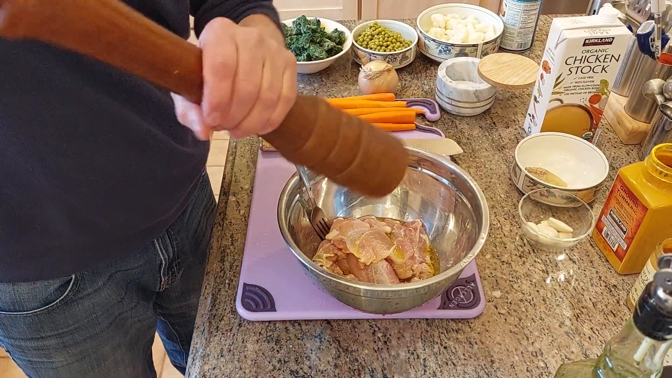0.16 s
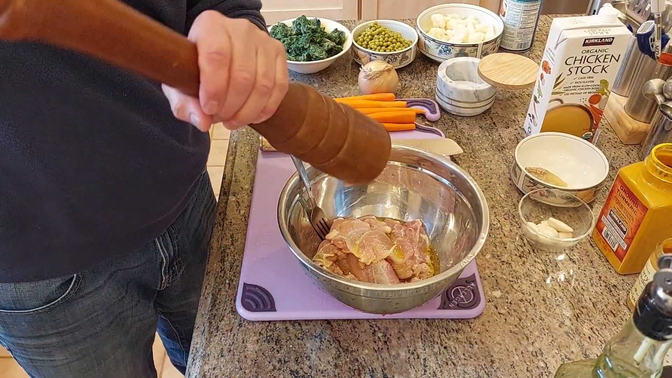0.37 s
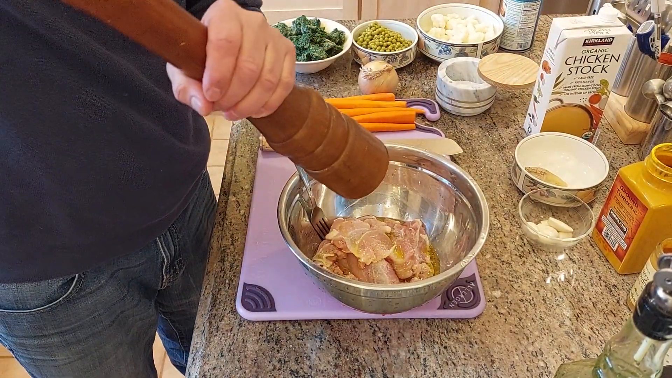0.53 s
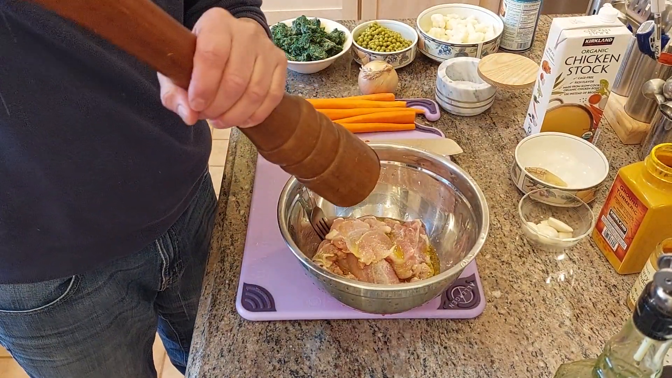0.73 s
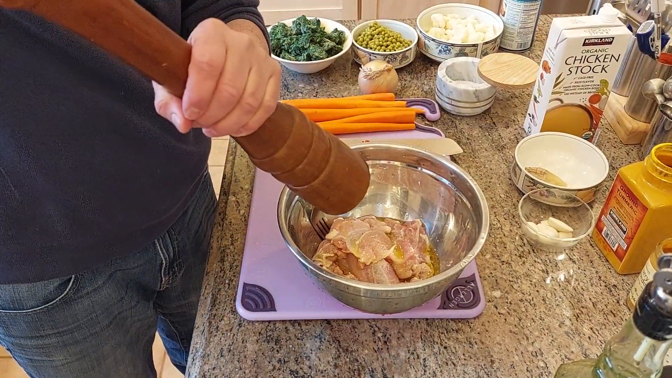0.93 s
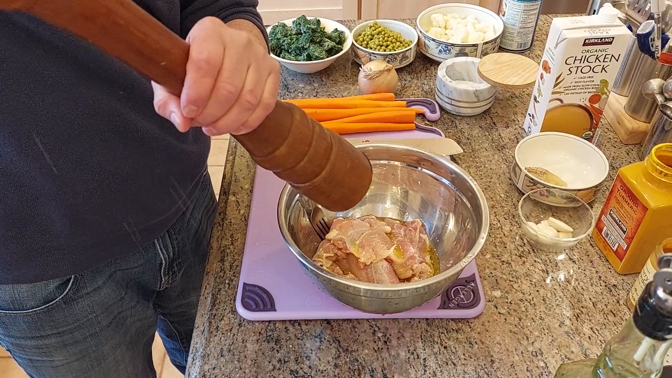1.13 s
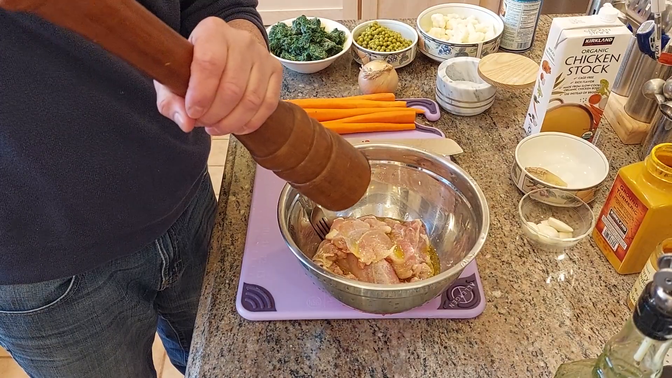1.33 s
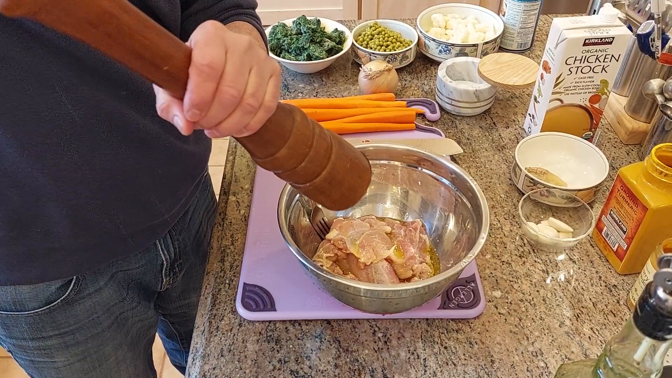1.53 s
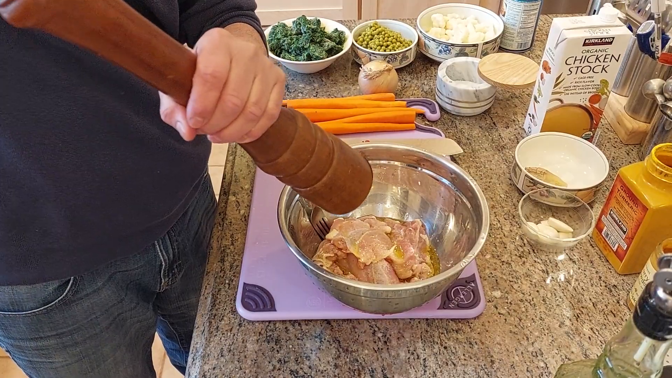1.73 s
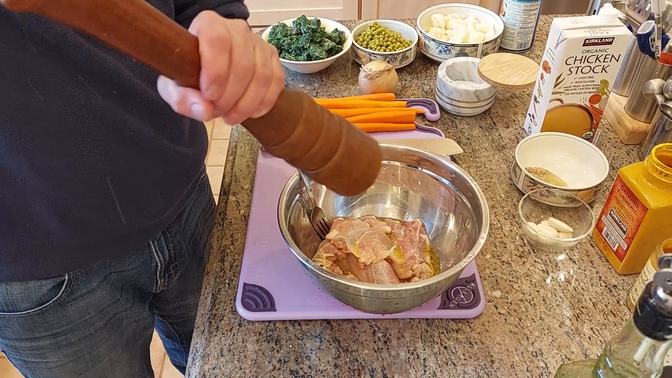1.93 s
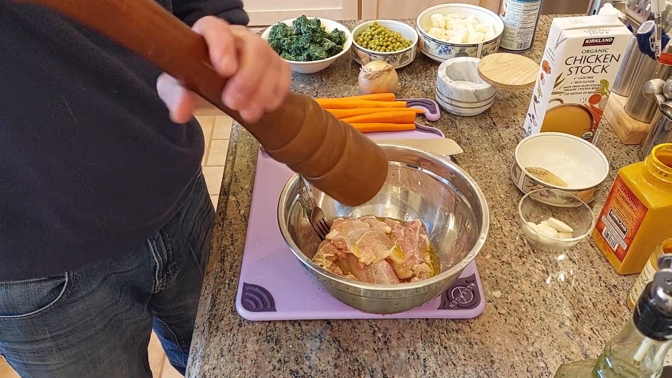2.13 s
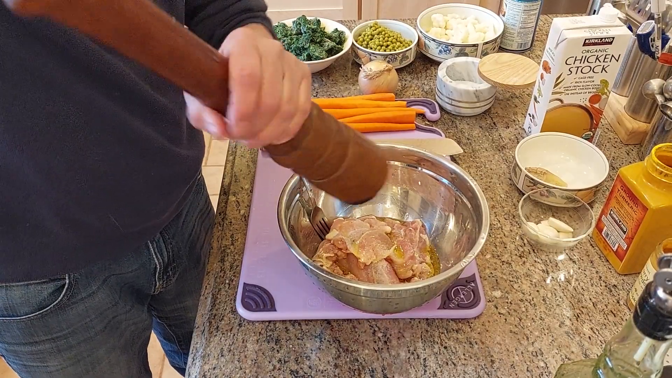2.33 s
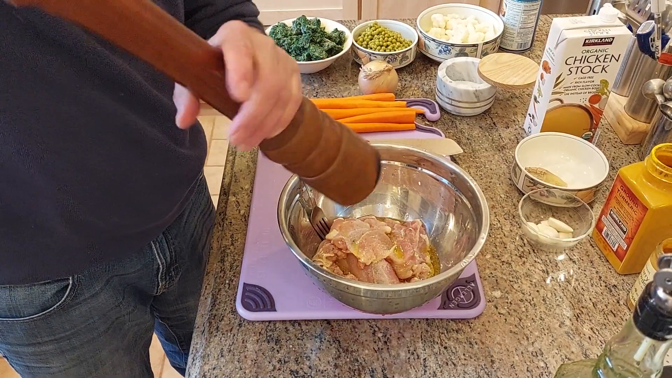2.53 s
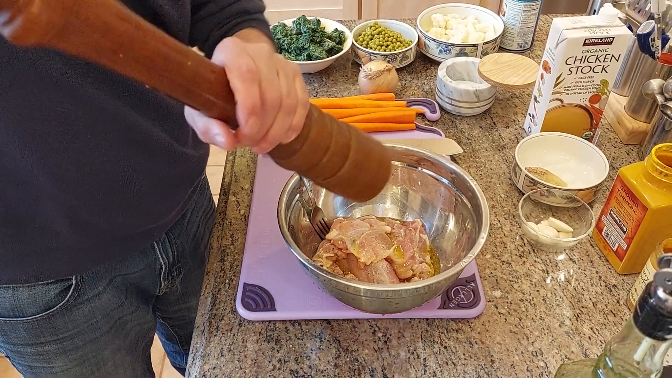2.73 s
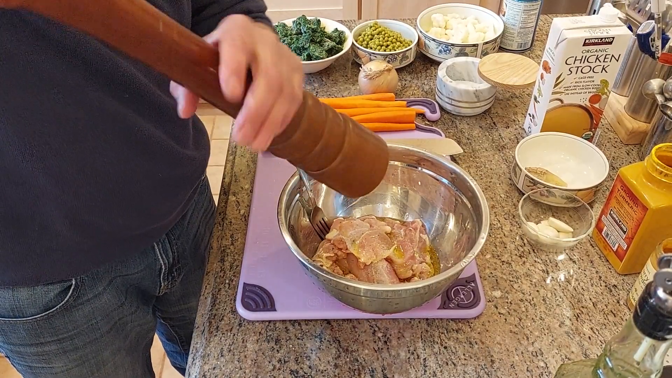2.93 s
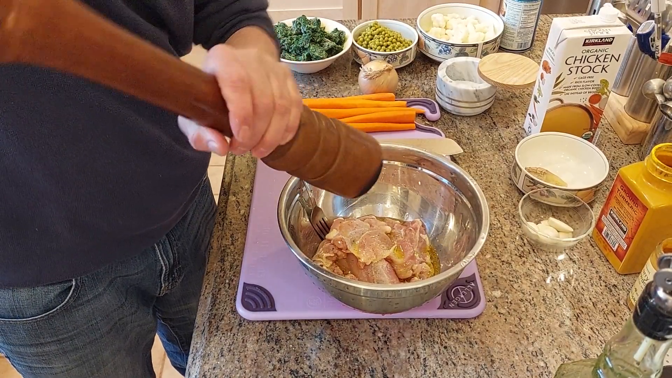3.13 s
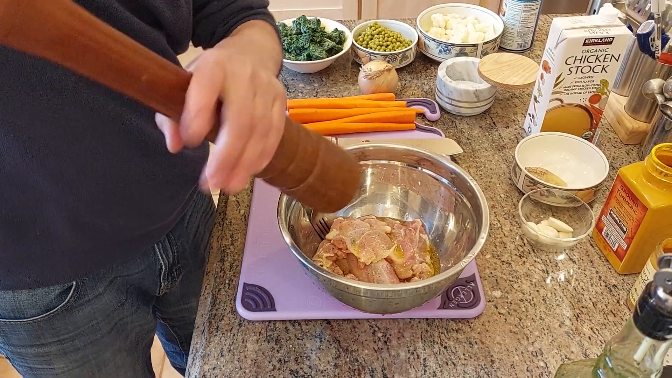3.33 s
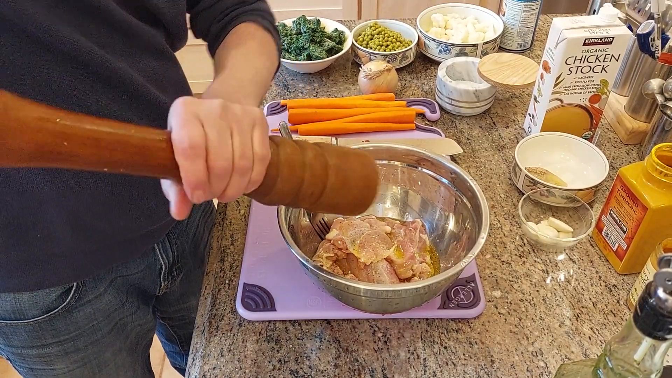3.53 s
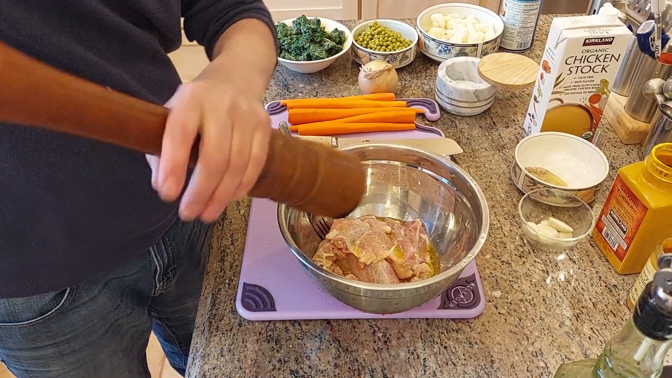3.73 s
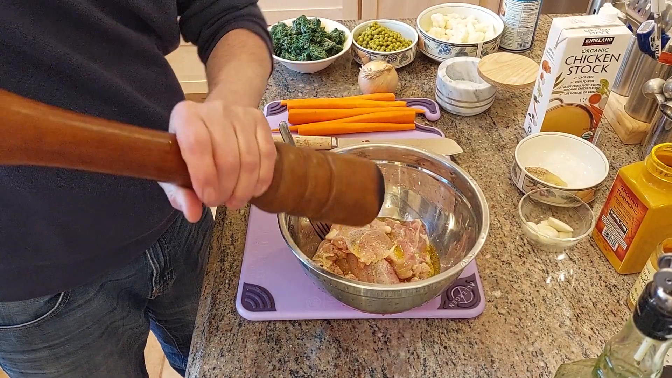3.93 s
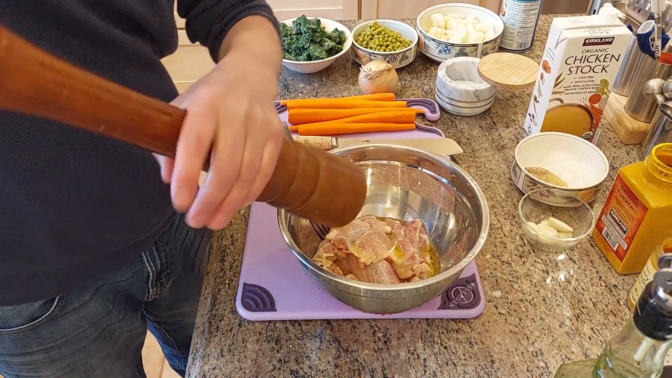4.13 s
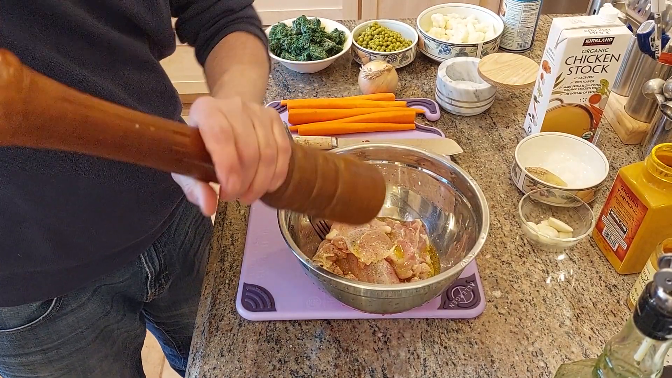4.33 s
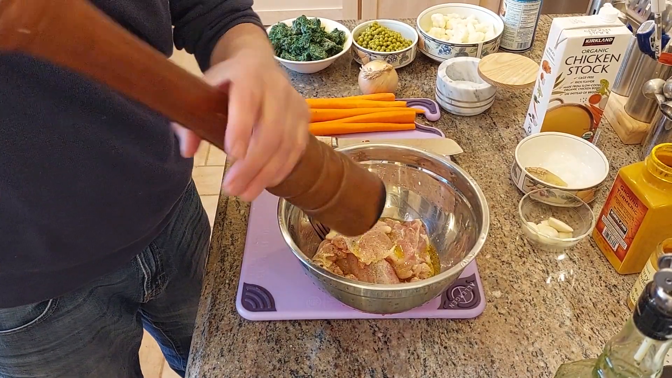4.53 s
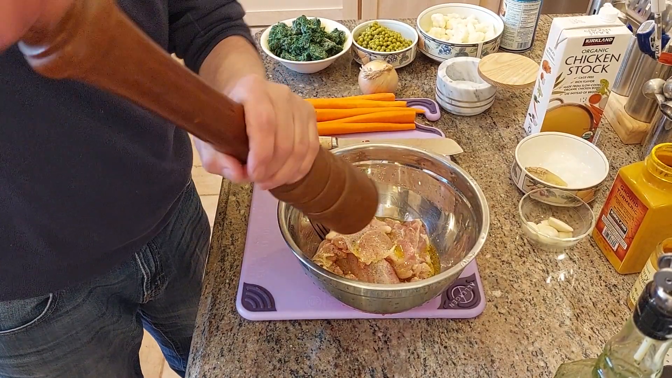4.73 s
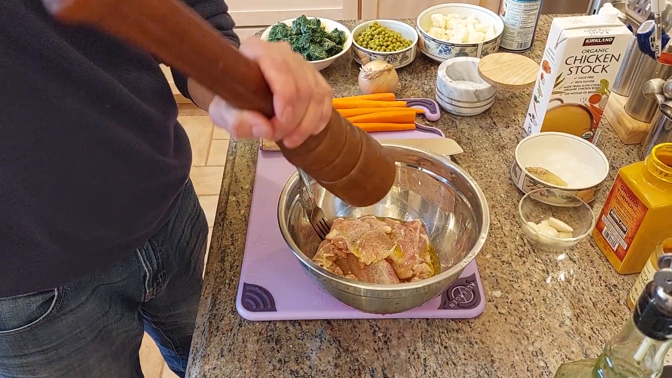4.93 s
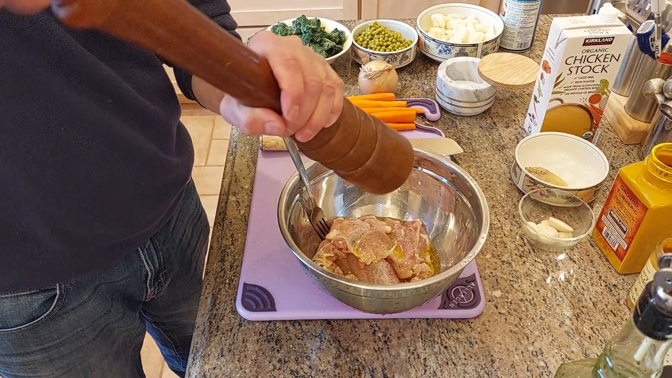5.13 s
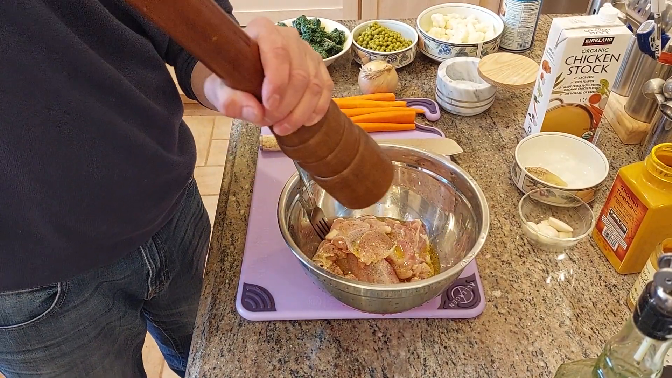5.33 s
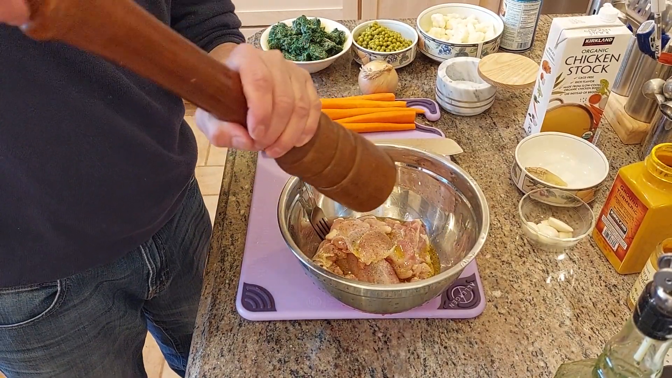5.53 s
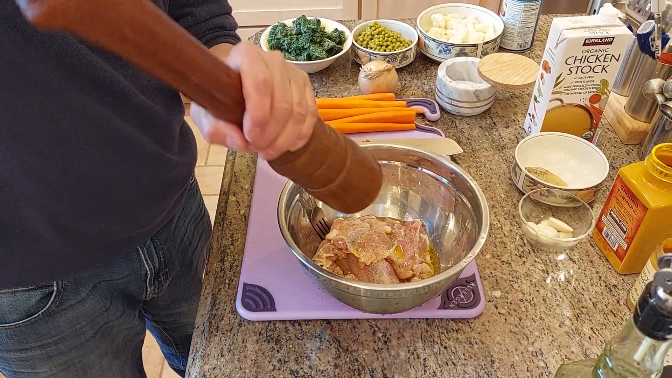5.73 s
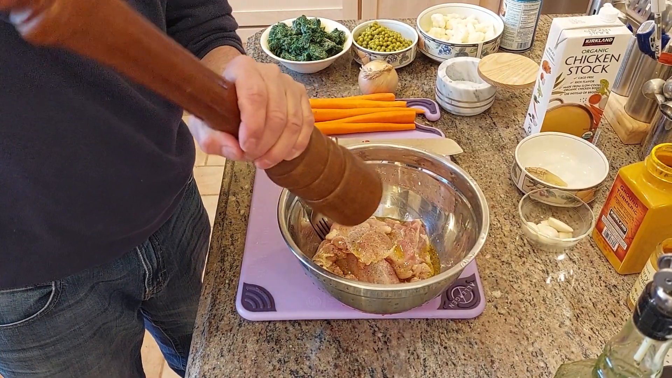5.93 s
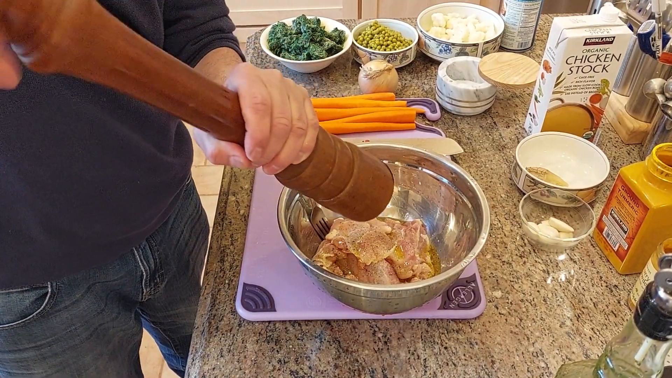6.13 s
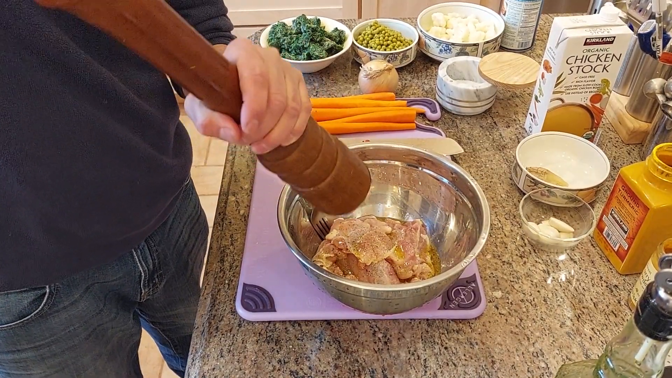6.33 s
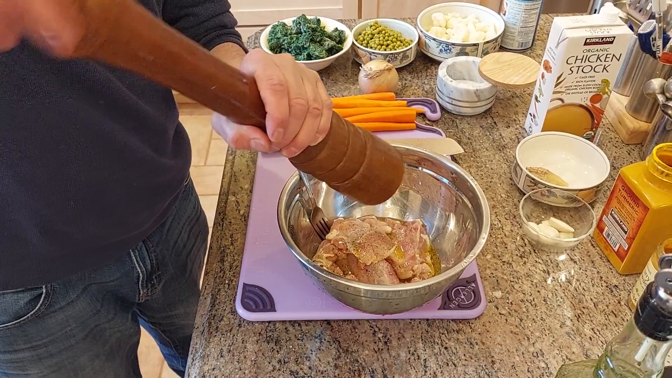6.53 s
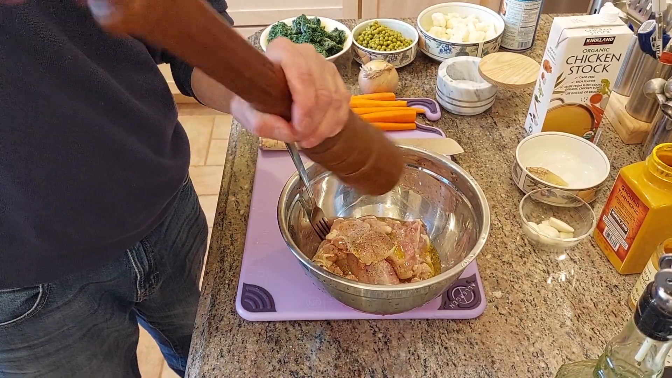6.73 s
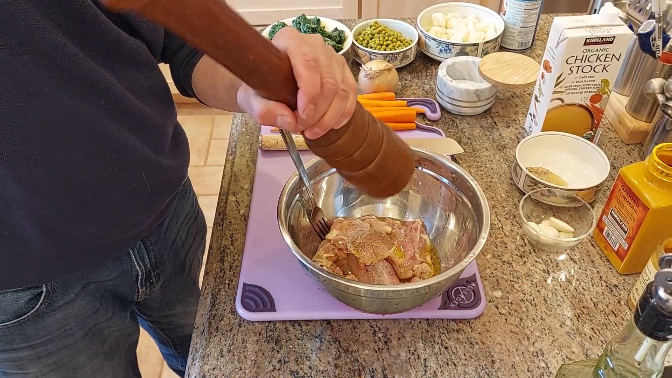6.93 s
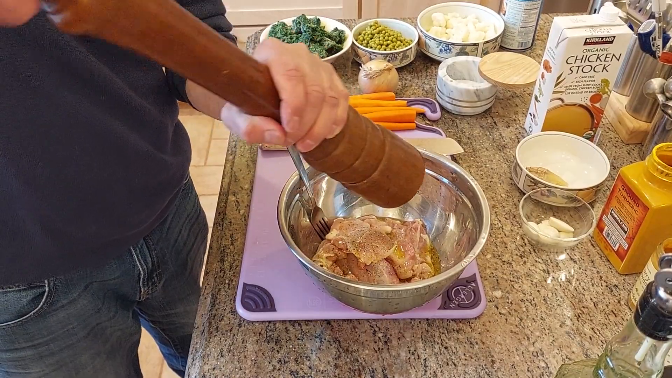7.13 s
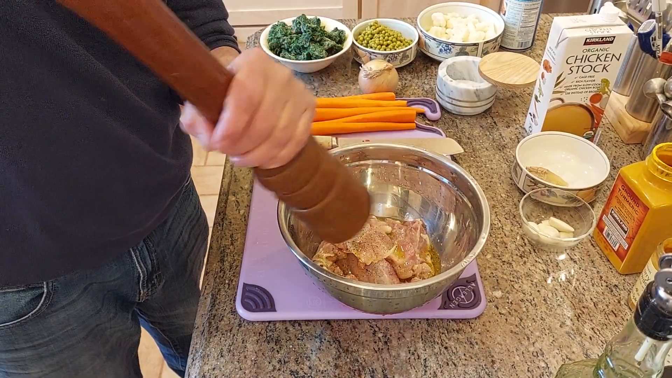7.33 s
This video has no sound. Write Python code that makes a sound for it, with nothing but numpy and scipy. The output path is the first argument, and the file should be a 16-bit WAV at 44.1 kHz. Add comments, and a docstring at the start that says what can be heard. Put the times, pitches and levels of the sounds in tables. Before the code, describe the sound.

A big wooden pepper mill close by in a hard kitchen. One soft crunch, then a quiet pause of faint handling rustle and low room hum. From about two seconds, sharp, loud peppercorn cracks come in short gritty twists, slow at first, then faster and regular until the end. Loose wood knocks dully before many twists; a short room echo follows each. Close stereo microphone.

```python
"""A long wooden pepper mill is twisted over a steel bowl in a hard kitchen.
At first the room still rings from an earlier twist, over mains hum, gliding low drones, room noise and hiss.
The loose shaft knocks as each twist takes up; then peppercorns crack, ringing the wood and the burr,
and finer grit crunches between them. Fading noise makes the kitchen's echo. Hands and cloth rustle,
made of swelling treble noise, and later one wavering tone gives a faint squeak."""
import sys
import numpy as np
from scipy import signal
from scipy.fft import rfft, irfft, next_fast_len
from scipy.io import wavfile
from scipy.ndimage import uniform_filter1d, map_coordinates

SR = 44100
rng = np.random.default_rng(int(sys.argv[2]) if len(sys.argv) > 2 else 0)


def bounce(signal):
    """Save signal as a 16-bit WAV file at the path given by the first command-line argument."""
    frames = np.transpose(np.atleast_2d(signal))
    limited = np.clip(frames, -1, 1)
    pcm = np.round(limited * 32767).astype(np.int16)
    wavfile.write(sys.argv[1], SR, pcm)


N = 329427  # length in samples

# Levels in the tables are relative: the functions add their own gains.
# the loudest peppercorns breaking: start_s, burr_level_db, body_over_burr_db
PEPPERCORNS = [(0.1546, -46.5, 5), (0.1717, -32, 3), (0.2125, -21.5, -0.5), (0.2288, -20.5, -6.5),
               (0.2396, -23.5, -1), (0.245, -24.5, -9), (0.2624, -22, -25.5), (0.3, -33.5, 1),
               (1.96, -33, -12.5), (1.9836, -8.5, -2.5), (1.9923, -7.5, -3.5), (2.0026, -9, -2.5),
               (2.0092, -6.5, -2), (2.0195, -12.0, 2), (2.0292, -15, -10), (2.0465, -8, 0),
               (2.0602, -11, -13.5), (2.3616, -10.5, -3), (2.3698, -10, -4.5), (2.3814, -9.0, -4.5),
               (2.3878, -8, -4.5), (2.4007, -13.5, -2), (2.7226, -25.5, 0.5), (2.7333, -18.5, -4.5),
               (2.7385, -21.5, -13), (2.7467, -11.5, -1), (2.752, -10.0, -9.5), (2.7606, -13, -12.5),
               (2.767, -8.5, -3.0), (2.7742, -9, 1), (2.787, -6.5, -21.5), (2.7914, -3.5, -1.5),
               (3.1245, -28.5, -9), (3.1457, -25.5, -16), (3.1638, -25.0, -6), (3.169, -23.5, -3),
               (3.1812, -32.5, -6.0), (3.1941, -18, -3.5), (3.305, -40.5, 2.5), (3.3105, -37.5, -1.5),
               (3.5317, -38.5, -4.0), (3.5596, -19.0, -2.5), (3.565, -23.5, -10.5), (3.6011, -23.5, -5.5),
               (3.9293, -39, 19), (3.9373, -20, -3.5), (3.9416, -22.5, -7.5), (3.9722, -25, -0.5),
               (3.9818, -12.5, 0.5), (3.9967, -12.5, -9.5), (4.0894, -27.5, -2), (4.2951, -50, 21),
               (4.3077, -15.5, -8.5), (4.3147, -11, -6), (4.3282, -14.5, -11), (4.3471, -9.5, -11),
               (4.3912, -15.5, -3.5), (4.7056, -35.0, -4.5), (4.7175, -18, -2.5), (4.7235, -18.5, 4.5),
               (4.762, -5, -6.5), (4.7723, -6, -6), (4.8023, -19.5, 3.5), (4.8132, -18, -2),
               (4.9413, -31, 0), (4.9455, -35.5, -4.5), (4.9732, -33, 2), (4.9816, -27.5, 0.5),
               (5.1162, -25.5, -7.0), (5.1209, -17.5, -5.5), (5.1271, -22, -4.5), (5.1398, -21.5, -4.5),
               (5.1469, -11.5, -9), (5.1528, -9.5, -4.5), (5.1595, -9.5, -5.5), (5.1692, -12, -7.0),
               (5.253, -22.5, -27), (5.2671, -21.5, 0.5), (5.2741, -14.0, -6.0), (5.2834, -15.0, -6.5),
               (5.2928, -18, 1), (5.3003, -15.5, -11.5), (5.3162, -23, 6.5), (5.3219, -27, 0.5),
               (5.3335, -32, -11.5), (5.4566, -18, 0), (5.4736, -11.5, -1), (5.4857, -15.5, -4.5),
               (5.4988, -7, -12), (5.5223, -10.5, 1), (5.6251, -18, -1.5), (5.6375, -16, -1.5),
               (5.6426, -28.5, -12.5), (5.8012, -12.5, -5), (5.8129, -16, -8), (5.8201, -14.5, -9),
               (5.8407, -12, -1), (5.8536, -13, -5.5), (5.9364, -24, 1), (5.9618, -23.0, 0),
               (5.9679, -19.0, 0), (5.9835, -22.5, -1.5), (6.1223, -19, -11), (6.1317, -15, -13.5),
               (6.1461, -16.5, -2), (6.163, -10, -9), (6.1744, -11.5, -1.5), (6.2705, -25, -9),
               (6.2767, -22.5, -22), (6.283, -18.5, -8.5), (6.3033, -16, -2.5), (6.4324, -25, -13),
               (6.441, -15.5, -15.5), (6.4699, -17, -10.5), (6.4741, -6.5, -7.5), (6.492, -13, -2.5),
               (6.5967, -36.5, -4), (6.6155, -22.5, 2.5), (6.7748, -24.5, -16.0), (6.7812, -24, -17.5),
               (6.7878, -21.5, -18), (6.8115, -22, -13.5), (6.8158, -25, -11), (6.826, -17, -0.5),
               (6.8337, -25.5, -10), (6.9275, -19, -4.5), (6.9359, -29, -2), (6.964, -21, -1),
               (7.1106, -24.5, -2.5), (7.1161, -16, -3), (7.1278, -8.5, -2.5), (7.1455, -13.5, -18),
               (7.1563, -15, -5), (7.1713, -15.5, -12.0), (7.2763, -26.5, -2), (7.2882, -28, 2),
               (7.2982, -33, 0), (7.3028, -19.5, 0.5), (7.3095, -24.5, -5.5), (7.3332, -29, 0.5),
               (7.4606, -15, -10)]
# the shaft taking up its play: start_s, level_db, upper_ring_over_level_db
SHAFT_KNOCKS = [(0.084, -42, 7), (0.469, -51.5, 6.5), (0.822, -53, -13), (1.564, -77, 10), (1.915, -85, 17),
                (1.944, -73, 25), (2.323, -46.5, 3), (2.669, -53, 5), (2.7, -49.5, 8.5), (3.032, -46.5, 5),
                (3.093, -44.5, 8.5), (3.521, -53, -9), (3.827, -64, -19), (3.872, -59.5, 6.5),
                (3.905, -45.5, -0.5), (4.263, -45, 11), (4.578, -48.5, 8), (4.668, -39, -9),
                (4.929, -33.5, -10), (5.086, -35.5, 12.5), (5.78, -36, 12.5)]
# twists of the wrist, the short dull ones turning back: start_s, length_s, grit_level_db, brightness_db
TWISTS = [(0.199, 0.072, -28.5, -9), (0.46, 0.08, -71.5, -15), (0.77, 0.066, -63, -1),
          (1.953, 0.11, -25, -0.5), (2.356, 0.085, -20.5, -2), (2.715, 0.085, -28.5, -3),
          (3.115, 0.09, -33.5, -2), (3.30, 0.0267, -55.5, -5), (3.516, 0.13, -34.5, -4),
          (3.921, 0.088, -26.5, -7), (4.291, 0.082, -20, -7), (4.699, 0.016, -38.5, -11.5),
          (4.767, 0.052, -23.5, -5.5), (4.918, 0.0646, -33, -13), (5.106, 0.084, -25.5, -6.5),
          (5.243, 0.052, -26, -7.5), (5.447, 0.12, -25.5, -6), (5.584, 0.045, -31.5, -12),
          (5.776, 0.06, -26.5, -8.5), (5.943, 0.047, -36.5, -9.5), (6.116, 0.078, -22.5, 1.5),
          (6.252, 0.078, -29.5, -11), (6.436, 0.068, -27.5, -10.5), (6.576, 0.055, -30.5, -1),
          (6.771, 0.068, -26.5, 1), (6.921, 0.053, -39.5, -3), (7.107, 0.088, -31.5, -12),
          (7.27, 0.045, -36.5, -14), (7.434, 0.036, -39, -4)]
# resonances of the mill and, at the top, the microphone, from low to high: pitch_hz, width_hz, level_db
HOLLOW = [(307, 420, -10), (566, 860, -4), (1030, 365, -3)]
BODY = [(1343, 690, -11), (2213, 290, 1)]
BURR = [(3740, 974, -1.5), (5127, 520, 2), (6380, 933, -5.5)]
SIZZLE = [(9200, 310, -8), (10670, 1600, -1), (13470, 7600, -4)]
# right over left for hollow, body, burr, sizzle (the burr faces the right microphone port): level_db
RIGHT_OVER_LEFT = [0.5, -1.5, 3, 1.5]
# how long the kitchen takes to fade by 60 dB, before stretching: pitch_hz, fade_s
KITCHEN_FADE = [(250, 0.36), (800, 0.39), (2100, 0.2672), (5500, 0.3), (14000, 0.26)]
# low drones from outside, one list of points per drone: time_s, pitch_hz, level_db
DRONES = [
    [(0.0, 71.2, -63), (0.3, 72.2, -55), (0.95, 71.5, -65), (2.16, 67.2, -49.5), (2.8, 63.6, -57),
     (3.7, 61.5, -65.5), (4.39, 59.1, -49), (6.0, 53, -74)],
    [(0.0, 97.3, -54), (0.4, 99, -80), (0.8, 100.2, -54), (1.14, 87, -60), (2.04, 87.3, -53.5),
     (2.4, 88.2, -62.5), (4.7, 86, -70)],
    [(4.7, 101.6, -63), (5.38, 101.2, -54.5), (5.6, 98.4, -71), (6.24, 99, -62), (6.5, 99.6, -87)],
    [(1.8, 147, -79), (2.25, 154, -59.5), (2.83, 156, -63), (3.6, 158.6, -74.5), (4.6, 161.2, -68.5),
     (4.9, 160, -57), (6.8, 161, -72)],
]
# mains hum: pitch_hz, level_db
HUM = [(120, -63.5), (240, -70.5), (360, -84)]
# loudness of the low room noise: time_s, level_db
ROOM_NOISE_LEVEL = [(0.0, -62), (1.14, -63), (2.27, -59.5), (3.29, -63.5), (3.41, -67.5), (3.93, -67),
                    (4.12, -62.5), (4.54, -59), (5.22, -59), (6.8, -59), (7.47, -57.5)]
# colour of the low room noise: pitch_hz, density_db (per Hz)
RUMBLE_COLOUR = [(20, -42.5), (40, -9.5), (80, -7), (120, -5), (200, -10.5), (300, -10.5), (420, -23),
                 (700, -32), (2000, -42), (5000, -62)]
# colour of the hiss and rustle: pitch_hz, density_db (per Hz)
HISS_COLOUR = [(1500, -15), (5000, -15), (8000, -6.5), (10500, -11.5), (13100, -3), (13500, -0.5),
               (13900, -6), (15000, 0), (16000, -12)]
# hands and sleeves shifting: peak_s, level_db, rise_s, fall_s
RUSTLES = [(0.531, -68, .08, 0.071), (0.798, -62, .14, 0.11), (0.97, -82, .04, 0.077),
           (1.056, -72, .015, .12), (1.196, -72.5, .025, .18), (1.604, -66.5, .2, .09),
           (1.844, -69.5, .03, 0.29), (2.24, -64, .1, .1), (2.56, -65, .1, .2), (3.03, -66.5, .12, .06),
           (3.359, -68.5, .2, 0.16), (3.79, -63, .15, .12), (4.16, -60, .1, .12), (4.531, -63, .1, .08),
           (4.61, -65, .06, 0.24)]
# one faint squeak: middle_s, pitch_hz, level_db, half_length_s
SQUEAK = (1.635, 1900, -76, .014)


def amp(db):
    """Turn decibels into a plain multiplier."""
    return 10 ** (np.asarray(db) / 20)


def unit(x):
    """Scale a sound to an average (rms) level of 1."""
    return x / np.sqrt(np.mean(x ** 2) + 1e-20)


def along(points, hz):
    """Read (pitch, value) points at any pitch, on a log pitch axis."""
    pitch, value = np.transpose(points)
    return np.interp(np.log(hz + 1), np.log(pitch + 1), value)


def curve(s, value, outside):
    """Join points by straight lines, one value per sample."""
    return np.interp(np.arange(N) / SR, s, value, outside, outside)


def wobble(rate):
    """A smooth random curve with this many knots a second."""
    knots = rng.standard_normal(int(N * rate / SR) + 4)
    return map_coordinates(knots, [np.arange(N) * rate / SR])


def filtered(x, response):
    """Change each frequency's strength and timing by a complex response."""
    m = next_fast_len(N + SR // 2)
    return irfft(rfft(x, m) * response(np.fft.rfftfreq(m, 1 / SR)), m)[..., :N]


def ring(x, modes):
    """Resonances answer a push; a click of energy 1 keeps energy 1."""
    def response(f):
        total = 0
        for k, (pitch, width, db) in enumerate(modes):
            resonance = 1j * f * width / (pitch * pitch - f * f + 1j * f * width)
            total = total + (-1) ** k * amp(db) * resonance  # neighbours take opposite signs
        return total

    return filtered(x, lambda f: response(f) / np.sqrt(np.mean(abs(response(f)) ** 2)))


def bursts(s, db, t60, jag):
    """Each break is a short swell of noise, a click and a jagged tail; a second, clickless part adds stereo."""
    t = np.arange(400) / SR  # the tail is cut after about 9 ms
    snap = 16  # samples of rising noise before the click
    rough = jag * rng.standard_normal((len(s), 2, len(t)))
    shape = rough * amp(-60 * t / t60) * np.minimum(1, t * SR / snap)
    shape[:, 0, snap] = 1
    # energy 1, then the level of each burst
    shape *= amp(db)[:, None, None] / np.linalg.norm(shape, axis=2, keepdims=True)
    first = np.round(np.asarray(s) * SR).astype(int)
    at = (first[:, None] + np.arange(len(t))).ravel()
    return np.array([np.bincount(at, shape[:, k].ravel(), N + SR)[:N] for k in range(2)])


def ports(pair, alike, right_db, lead_s):
    """Two microphone ports share part of a sound; a lead lets the left one hear it first."""
    turn = np.arccos(np.clip(alike, 0, 1)) / 2
    opposite = pair[1] * np.array([[1], [-1]])
    both = np.cos(turn) * pair[0] + np.sin(turn) * opposite
    half = np.array([[.5], [-.5]])  # left, right
    return filtered(both * amp(-right_db * half), lambda f: np.exp(2j * np.pi * f * lead_s * half))


def noise(colour, alike):
    """Coloured random noise in stereo, with an average (rms) level of 1."""
    pair = filtered(rng.standard_normal((2, N)), lambda hz: amp(along(colour, hz)))
    return unit(ports(pair, alike, 0, lead_s=0))


def earlier_twist(db, t60):
    """The room still rings with the twist before: resonant noise that fades steadily."""
    modes = [(700, 1100, -1.95)] + BODY + BURR + [(14000, 5000, -7.5)]
    wash = ring(rng.standard_normal((2, N)), modes)
    return amp(db - 60 * np.arange(N) / SR / t60) * wash


def mains_hum():
    """Steady mains tones whose loudness wavers."""
    t = np.arange(N) / SR
    return sum(amp(db + 3 + 2.2 * wobble(7)) * np.sin(2 * np.pi * hz * t) for hz, db in HUM)


def low_drones():
    """Gliding tones from outside that waver a little in pitch and loudness."""
    t = np.arange(N) / SR
    total = 0
    for points in DRONES:
        s, hz, db = np.transpose(points)
        level = amp(curve(s, db - 1, outside=-120) + 2.9 * wobble(6.6))
        smooth_level = uniform_filter1d(level, SR // 20)
        pitch = np.interp(t, s, hz) + 0.27 * wobble(2.2)
        total = total + smooth_level * np.sin(2 * np.pi * np.cumsum(pitch) / SR)
    return total


def room_noise():
    """Low rumbling noise that swells a little."""
    level = amp(np.interp(np.arange(N) / SR, *np.transpose(ROOM_NOISE_LEVEL)))
    level = level * amp(2.5 * wobble(6))
    return level * amp(-2.0) * noise(RUMBLE_COLOUR, 0.65)


def microphone_hiss():
    """Faint, steady treble noise, mostly different in each port."""
    return amp(-82.5) * noise(HISS_COLOUR, .1)


def shaft_knocks():
    """Wood meets wood and rings the hollow and the body; the blunt contact softens the treble."""
    s, db, upper_db = np.transpose(SHAFT_KNOCKS)
    low = ring(bursts(s, db + 23, 0.053, jag=0.13), HOLLOW)
    upper = ring(bursts(s, db + upper_db + 24.5, 0.0063, jag=0.51), BODY)
    blunt = filtered(low + upper, lambda f: 1 / (1 + 1j * f / 2400) ** 3)
    return ports(blunt, .85, 0, lead_s=0.00017)


def ring_parts(pushes):
    """Four pushes ring the mill's hollow shaft, body and burr, and the sizzling treble."""
    parts = [(HOLLOW, .9), (BODY, .85), (BURR, .7), (SIZZLE, .55)]  # with left-right likeness
    out = 0
    for push, (modes, alike), right_db in zip(pushes, parts, RIGHT_OVER_LEFT):
        out = out + ports(ring(push, modes), alike, right_db, lead_s=0.00014)
    return out


def peppercorn_cracks():
    """Breaking peppercorns push every group of resonances; harder cracks are brighter."""
    s, burr, woody = np.transpose(PEPPERCORNS)
    body = burr + woody
    usual_db = -19
    scatter_db = 5 * rng.standard_normal(len(s))
    sizzle = burr - 12 + .3 * (burr - usual_db) + scatter_db
    # level_db, tail t60_s, jaggedness
    settings = [(body + 2, .045, .7), (body + 15, .012, .15), (burr + 13.44, .017, .17), (sizzle + 15, .019, .26)]
    return ring_parts([bursts(s, db, t60, jag) for db, t60, jag in settings])


def grains(per_s, spread_db):
    """Times, levels and brightness of the small grains crushed during each twist."""
    rows = rng.random((int(per_s * N / SR), 2))
    s = rows[:, 0] * N / SR
    db, bright_db = np.full(len(s), -150.), np.zeros(len(s))  # nearly silent between twists
    for start, length, level, bright in TWISTS:
        inside = (s >= start) & (s < start + length)
        progress = (s[inside] - start) / length
        # loudest a little over a quarter of the way through
        db[inside] = level + np.interp(progress, [0, 0.28, 1], [-8.5, 0, -3.5])
        bright_db[inside] = bright
    db += 3.5 * wobble(120)[(s * SR).astype(int)]  # the grains come in clumps
    db -= spread_db * np.log(rows[:, 1] + 0.013)  # many small grains, few large
    return s, db, bright_db


def grit():
    """Many tiny breaks crunch together, each ringing the resonances with its own tone colour."""
    s, db, bright = grains(per_s=700, spread_db=4)
    colour_db = rng.normal(0, 3, (len(s), 4))
    # gain_db, tail t60_s
    settings = [(-8, .045 / 3), (.6 - bright / 3, .012 / 3), (3 + bright, .017 / 3), (-2.5 + bright, .019 / 3)]
    pushes = [bursts(s, db + gain_db + colour_db[:, k], t60, jag=0.3) for k, (gain_db, t60) in enumerate(settings)]
    return ring_parts(pushes)


def kitchen(x, stretch):
    """Each frequency of the echo dies at its own speed, in a tail made of fading noise."""
    out, step = np.zeros((2, N + 2 * SR)), SR // 4
    delay = 130  # samples, about 3 ms
    for at in range(0, N, step):  # the noise of the tail is drawn afresh every quarter second
        hz, t, z = signal.stft(rng.standard_normal((2, SR * 3 // 4)), SR, nperseg=256)
        alike = 1 / (1 + (hz[:, None] / 900) ** 2)  # long waves reach both ports alike
        z = np.array([z[0], alike * z[0] + np.sqrt(1 - alike ** 2) * z[1]])
        t60 = stretch * along(KITCHEN_FADE, hz)[:, None]
        tail = signal.istft(z * amp(-60 * t / t60), SR, nperseg=256)[1]
        wet = signal.fftconvolve(x[:, at:at + step], tail / np.linalg.norm(tail[0]), axes=1)
        out[:, at + delay:at + delay + wet.shape[1]] += wet
    return out[:, :N]


def hand_rustle():
    """Hands and cloth rub: treble noise swells and fades with a flickering level."""
    t = np.arange(N) / SR
    level = 0
    for s, db, rise, fall in RUSTLES:
        away = np.maximum((s - t) / rise, (t - s) / fall)
        level = level + amp(db - 20 * away)  # 20 dB down after one rise or fall time
    return level * amp(2.5 * wobble(120)) * noise(HISS_COLOUR, 0.27)


def faint_squeak():
    """A short tone swells and fades while its loudness and phase waver quickly."""
    t = np.arange(N) / SR
    s, hz, db, half = SQUEAK
    swell = np.exp(-((t - s) / half) ** 2)
    return amp(db + 3.3 * wobble(150)) * swell * np.sin(2 * np.pi * hz * t + wobble(160))


def scene():
    """Add the mill, its echo and the background sounds."""
    mill = shaft_knocks() + peppercorn_cracks() + grit()
    # the near walls answer fast, the rooms beyond faintly and longer
    room = amp(-3.0) * kitchen(mill, stretch=0.84) + amp(-15.5) * kitchen(mill, stretch=1.86)
    tones = mains_hum() + low_drones() + faint_squeak()
    tones = tones * amp([[.8], [-.8]])  # slightly louder on the left
    background = tones + room_noise() + hand_rustle() + microphone_hiss()
    return mill + room + earlier_twist(db=-50.5, t60=0.54) + background


def record(dry):
    """The loudest cracks are rounded off near full scale; nothing is kept above the band limit."""
    top_hz = 16000
    rounded = dry / (1 + abs(dry / .95) ** 6) ** (1 / 6)
    return filtered(rounded, lambda hz: hz < top_hz)


dry = scene()
out = record(dry)
bounce(out)
```